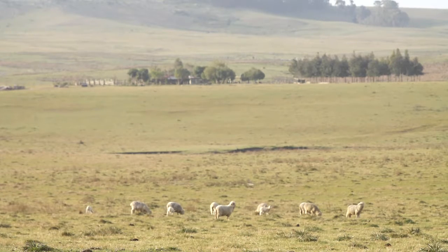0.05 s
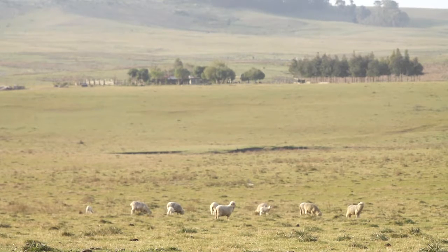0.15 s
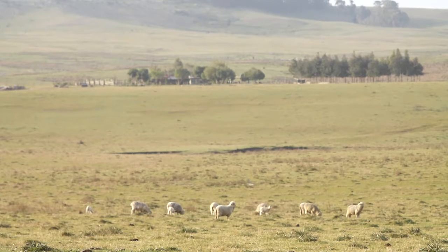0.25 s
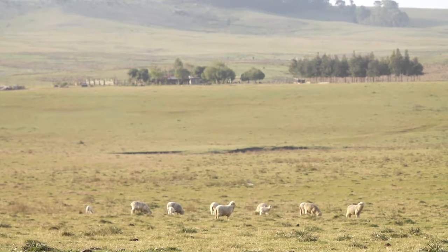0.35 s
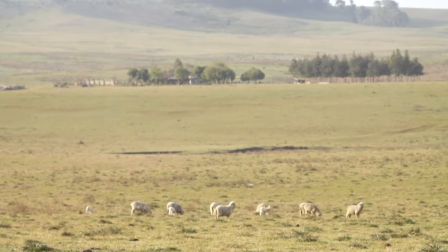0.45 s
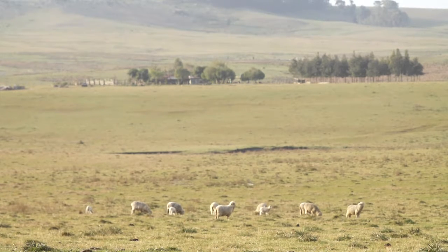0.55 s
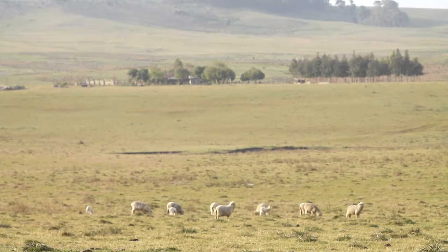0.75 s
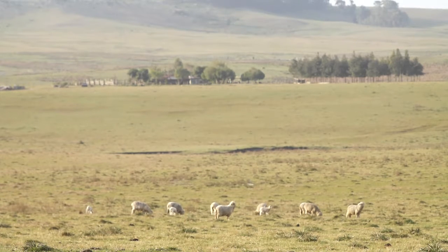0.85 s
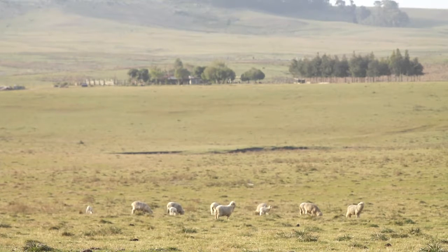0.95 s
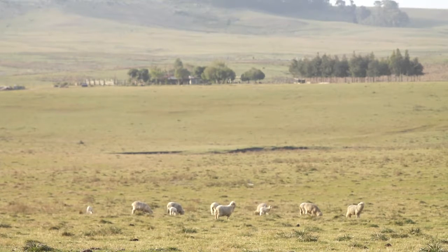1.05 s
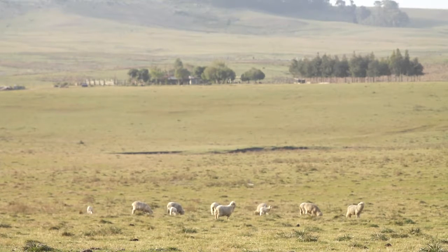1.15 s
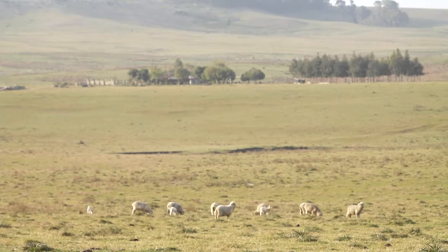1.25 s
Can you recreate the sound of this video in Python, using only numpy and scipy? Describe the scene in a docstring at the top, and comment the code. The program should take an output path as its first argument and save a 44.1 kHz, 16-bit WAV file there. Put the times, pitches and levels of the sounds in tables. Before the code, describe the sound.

A fly buzzes briefly past the microphone over low wind rumble in a pasture.

```python
"""An open pasture, heard at the two microphone ports of a camera. Over a steady hiss, light wind
rumbles as turbulent pressure on each port. Fingers rustle on the camera by friction, and small
impacts click and ring in its body. A fly, radiating one pressure pulse per wingbeat, buzzes closer,
skims the left port with a puff of air and lands; a moment later its wings tick five times."""
import sys
import numpy as np
from scipy import signal
from scipy.fft import rfft, irfft
from scipy.io import wavfile
from scipy.ndimage import uniform_filter1d

SR = 44100
rng = np.random.default_rng(int(sys.argv[2]) if len(sys.argv) > 2 else 0)


def inscribe(sig):
    """Save sig as 16-bit PCM at rate SR to the path in sys.argv[1].

    A 1-D sig is mono; a 2-D sig holds one channel per row.
    Samples are clipped to [-1, 1] before scaling.
    """
    pcm = np.round(np.clip(np.atleast_2d(sig).T, -1, 1) * 32767)
    wavfile.write(sys.argv[1], SR, pcm.astype(np.int16))


N = 57330
T = np.arange(N) / SR


def amp(db):
    """Amplitude ratio of a level in decibels."""
    return 10 ** (np.asarray(db) / 20)


def curves(rows):
    """Linear interpolation in time, one curve per column after the first."""
    times, *columns = np.transpose(rows)
    return [np.interp(T, times, column) for column in columns]


def bell(centre_s, width_s):
    """Gaussian envelope, falling to 1/e at width_s from its centre."""
    return np.exp(-((T - centre_s) / width_s) ** 2)


def gain_at(spectrum, hz):
    """Gain of a spectrum, its level interpolated over log frequency."""
    f, db = np.transpose(spectrum)
    return amp(np.interp(np.log(hz + 1), np.log(f), db))


def noise(spectrum):
    """Spectrally shaped Gaussian noise of unit rms, uncorrelated between the ports."""
    white = rfft(rng.standard_normal((2, N)))
    x = irfft(white * gain_at(spectrum, np.fft.rfftfreq(N, 1 / SR)), N)
    return x / x.std()


def drift(hz):
    """Random modulation: noise of unit rms, low-passed at hz."""
    x = irfft(rfft(rng.standard_normal(N)) / (1 + (np.fft.rfftfreq(N, 1 / SR) / hz) ** 4), N)
    return x / x.std()


# Spectrum of the steady air and hiss: f/Hz, relative density/dB
AIR_SPECTRUM = [(30, 16.5), (120, 18.5), (200, 12), (800, 2), (1500, 0), (3000, -4.5), (12000, -9),
                (15500, -11.5)]

def air(level_db=-51.5):
    """Stationary broadband noise forms the ambient floor."""
    return amp(level_db) * noise(AIR_SPECTRUM)


# Gust envelope, ahead of each port's gain: t/s, level/dB
GUST_LEVELS = [(0, -49), (.12, -40), (.34, -46.5), (.4, -29.5), (.45, -30), (.6, -39.5), (.66, -35),
               (.73, -36.5), (.83, -29.5), (.86, -38), (.91, -24), (.96, -36), (1.06, -34.5), (1.14, -41),
               (1.3, -46.5)]
# Spectra of the wind rumble and of the small eddies: f/Hz, relative density/dB
RUMBLE_SPECTRUM = [(5, 3), (20, -4), (32, 10.5), (50, 1.5), (120, -21), (1500, -107)]
EDDY_SPECTRUM = [(40, -4), (115, 0), (180, -15), (1500, -42.5)]

def wind(left_db=-4, right_db=2, eddy_db=-54, eddy_follow=0.64):
    """Turbulent pressure: gusts buffet each port separately, and small eddies partly follow them."""
    gust_db, = curves(GUST_LEVELS)
    buffet = noise(RUMBLE_SPECTRUM)
    buffet /= np.sqrt(uniform_filter1d(buffet ** 2, size=4000, axis=1))  # the gusts alone set its level
    eddies = noise(EDDY_SPECTRUM) * amp(eddy_db + eddy_follow * (gust_db - gust_db.mean()))
    return buffet * amp(gust_db) * amp([[left_db], [right_db]]) + eddies


# Scuffs of the fingers: t/s, half-width/s, level/dB, left minus right/dB
SCUFFS = [(.58, .006, -52, 6), (.612, .006, -51, 6), (1.243, .027, -52.5, 2)]
# Spectra of the rustle and of the bright fizz in slides and clicks: f/Hz, relative density/dB
RUSTLE_SPECTRUM = [(80, -8), (330, 0), (1100, -8), (5000, -26), (15000, -30)]
FIZZ_SPECTRUM = [(300, -43), (2800, 2.5), (4500, 2), (14000, -3.5), (15500, -24)]

def grip(slide_s=0.67, slide_width_s=0.072, slide_db=-56):
    """Friction noise: fingers rustle and slide softly on the camera."""
    scuffs = sum(amp([[db + pan_db / 2], [db - pan_db / 2]]) * bell(at_s, width_s)
                 for at_s, width_s, db, pan_db in SCUFFS)
    slide = amp(slide_db) * np.exp(-abs(T - slide_s) / slide_width_s)
    return scuffs * noise(RUSTLE_SPECTRUM) + slide * noise(FIZZ_SPECTRUM)


# Normal modes of the camera body: f/Hz, relative level/dB, T60/s
CASING_MODES = [(409, -8, .1), (684, -3, .13), (950, -10, .2), (1420, 4, .17), (2005, -10, .2)]

def casing(age, detune=0.0037):
    """Free vibration: damped modes, slightly detuned on each tap, with a random phase at each port."""
    ring = np.zeros((2, N))
    for hz, db, t60 in CASING_MODES:
        cycles = hz * rng.normal(1, detune) * age + rng.random((2, 1))
        ring += amp(db - 60 * age / t60) * np.sin(2 * np.pi * cycles)
    return ring


# Clicks: t/s, left snap/dB, right snap/dB, ring gain/dB, thud gain/dB, brightness (0-1)
HANDLING_CLICKS = [(0.1016, -41.5, -39, -49, -42.5, 0.76), (0.1102, -56, -55, -63, -46, 0.9),
                   (.2345, -38, -30.5, -51, -27.5, 0.3), (0.36, -61, -55, -59.5, -44, 0.3),
                   (0.6541, -41, -30, -50, -75, 0.2), (.661, -37, -33, -54, -64, 0.12),
                   (0.702, -63, -53, -52.5, -46.5, 0.4)]
# Spectra of a dull snap and of the body's diffuse rattle: f/Hz, relative density/dB
SNAP_SPECTRUM = [(200, -22), (900, 0.5), (1500, 8.5), (3000, 1.5), (8000, -19), (15000, -17)]
RATTLE_SPECTRUM = [(150, 1.5), (700, -3), (1420, -2.5), (6000, -35), (15000, -23)]

def handling(rise_s=0.00081, snap_decay_s=0.0028, rattle_decay_s=0.069, thud_hz=123, thud_decay_s=0.028):
    """Impact excitation: each snap sets the camera body ringing and thudding with exponential decay."""
    dull, fizz, rattle = noise(SNAP_SPECTRUM), noise(FIZZ_SPECTRUM), amp(-3) * noise(RATTLE_SPECTRUM)
    body_gain = amp([[-2.5], [0]])  # ring and thud are weaker on the left
    out = np.zeros((2, N))
    for at_s, left_db, right_db, ring_db, thud_db, bright in HANDLING_CLICKS:
        age = np.maximum(T - at_s, 0)
        burst = (1 - bright) * dull + bright * fizz
        snap = amp([[left_db], [right_db]]) * burst * np.exp(-age / snap_decay_s)
        modes = casing(age) + casing(age)  # two detuned sets interfere
        ring = amp(ring_db) * (rattle * np.exp(-age / rattle_decay_s) + modes)
        thud = amp(thud_db) * np.sin(2 * np.pi * thud_hz * age) * np.exp(-age / thud_decay_s)
        out += np.minimum(age / rise_s, 1) * (snap + (ring + thud) * body_gain)
    return out


# Spectrum of wing contact: f/Hz, relative density/dB
CONTACT_SPECTRUM = [(300, 29.5), (1500, -11), (2800, 11.5), (5000, 5), (13000, 10), (16000, -17)]

def wing_contact(start_s=0.4003, rate_hz=179, count=5, tick_db=-31.5, decay_s=0.0004, scrape_db=-38):
    """Contact noise at the left port: the wings scrape on landing, then tick, swelling and fading."""
    scrape = amp(scrape_db) * bell(centre_s=0.3135, width_s=0.004)
    beats = (T - start_s) * rate_hz
    swell = np.sin(np.pi * (np.floor(beats) + 1) / (count + 1)) * (beats >= 0) * (beats < count)
    tick_age = (beats % 1) / rate_hz
    ticks = amp(tick_db) * swell * np.exp(-tick_age / decay_s)
    return (scrape + ticks) * noise(CONTACT_SPECTRUM) * [[1], [0]]


PASS_S = 0.2545  # the fly crosses the left port

def downwash(puff_width_s=0.0042, puff_db=-16, slap_s=0.2578, slap_hz=496, slap_db=-9):
    """Near-field flow: the fly's air pushes, then pulls, on the left port; a passing wing tip slaps."""
    position = (T - PASS_S) / puff_width_s
    puff = -amp(puff_db) * position * np.exp((1 - position ** 2) / 2)
    slap = amp(slap_db) * np.cos(2 * np.pi * slap_hz * (T - slap_s)) * bell(slap_s, width_s=0.00074)
    return (puff + slap) * [[1], [0]]


# Wingbeat fundamental: t/s, f/Hz
WINGBEAT_PITCH = [(0, 203), (.025, 202), (.045, 184.7), (.11, 189.2), (.165, 185.2), (.21, 178.3),
                  (.25, 187.2), (.295, 186.2), (.315, 177)]
# Fly-by: t/s, left gain/dB, right gain/dB, overtone gain/dB, roughness (0-1)
FLY_BY = [(0, -50.5, -53.5, -12, 0), (.055, -49, -61.5, -14, 0), (.1, -48.5, -63, -5, 0.07),
          (.155, -41.5, -75, -11.5, 0.14), (.2, -32, -51, -16, 0), (.222, -23.5, -71, -9.5, .1),
          (.245, -20.5, -73, -9.5, 0.31), (.26, -20.5, -68, -1.5, 0.4), (.281, -20, -50, 3, 0.13),
          (.297, -16, -47, -8, 0.36), (.309, -16, -56, -5.5, 0.59), (.32, -26, -49, -10, 0.36),
          (.328, -55, -64, 4.5, 0.53)]
# Spectral envelope of a wing stroke: f/Hz, relative level afar/dB, relative level close up/dB
STROKE_SPECTRA = [(176, -2.5, 1), (372, -2.5, -2.5), (545, -8.5, -4.5), (715, -6, -10), (948, -2, -13),
                  (1115, -4, -19.5), (1340, -10, -22), (1730, -11.5, -29.5), (2700, -39, -40.5),
                  (4330, -35, -51)]
# Notch that turns the buzz hollow as the fly settles: t/s, gain at its centre/dB
HOLLOW_NOTCH = [(.281, 0), (.289, -9.5), (.302, -13), (.312, -13.5)]
# Spectrum of the air torn by the wings: f/Hz, relative density/dB
SWISH_SPECTRUM = [(40, -9), (130, 11), (300, -3), (550, 3.5), (900, -0.5), (1600, -13), (3000, -24.5),
                  (6000, -27.5), (13000, -31), (16000, -41)]

def fly(jitter=0.0072, flutter_hz=123, notch_hz=535, notch_width_hz=54, swish_db=-11.5, sway_db=1.8):
    """Periodic wing forces radiate a harmonic series; close up, turbulence adds a swish on each beat."""
    pitch, = curves(WINGBEAT_PITCH)
    left_db, right_db, overtones_db, roughness = curves(FLY_BY)
    hollow_db, = curves(HOLLOW_NOTCH)
    near_db, near_span_db = -26, 9.5  # where the wings' own air flow reaches the port
    nearness = (1.5 + np.tanh((left_db - near_db) / near_span_db)) / 2
    nearest_beat_s, crossing_s, fade_s = 0.2599, 0.001, 0.031
    phase = 2 * np.pi * np.cumsum(pitch * (1 + jitter * drift(flutter_hz))) / SR
    phase -= np.interp(nearest_beat_s, T, phase)  # one beat falls right over the port
    # Even harmonics change sign: the pulses suck on the way in and push once past the port.
    even_shift = np.pi / 2 * (np.tanh((T - PASS_S) / crossing_s) - 1)
    afar = [(hz, db) for hz, db, _ in STROKE_SPECTRA]
    close = [(hz, db) for hz, _, db in STROKE_SPECTRA]
    buzz = np.zeros(N)
    for k in range(1, 25):
        hz = k * pitch
        strength = gain_at(afar, hz) ** (1 - nearness) * gain_at(close, hz) ** nearness
        notch_db = hollow_db * np.exp(-((hz - notch_hz) / notch_width_hz) ** 2)
        tilt_db = overtones_db * min(np.log2(k) / 2, 1)
        flutter = roughness * np.sqrt(k + 1) / 2 * (drift(flutter_hz) + 1j * drift(flutter_hz))
        partial = (1 + flutter) * np.exp(1j * (k * phase + (k % 2 == 0) * even_shift))
        buzz += strength * amp(tilt_db + notch_db) * partial.real
    pulses = np.exp(0.9 * np.cos(phase))
    swish = nearness * amp(swish_db) * noise(SWISH_SPECTRUM) * pulses / np.sqrt(np.mean(pulses ** 2))
    sway = amp(sway_db * drift(hz=57))
    landed_s = FLY_BY[-1][0]
    fade = np.clip(1 - (T - landed_s) / fade_s, 0, 1)
    return (np.sqrt(2) * buzz + swish) * amp([left_db, right_db]) * sway * fade


def scene():
    """Linear superposition of the background, the camera noises and the fly."""
    return air() + wind() + grip() + handling() + wing_contact() + downwash() + fly()


def record(dry):
    """Band limiting: a linear-phase low-pass filter removes the highest treble."""
    lowpass = signal.firwin(401, cutoff=15300, window=("kaiser", 9), fs=SR)
    return signal.oaconvolve(dry, lowpass[None], "same")


dry = scene()
out = record(dry)
inscribe(out)
```